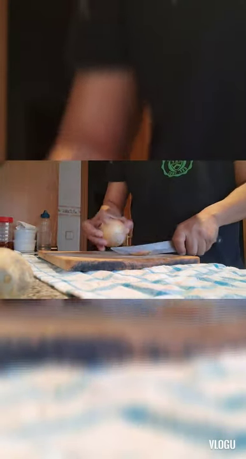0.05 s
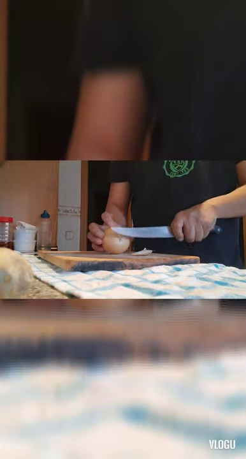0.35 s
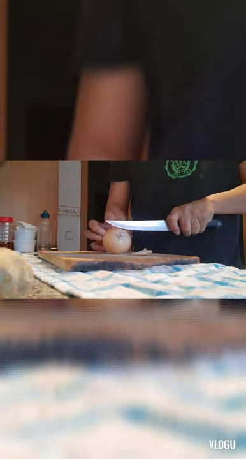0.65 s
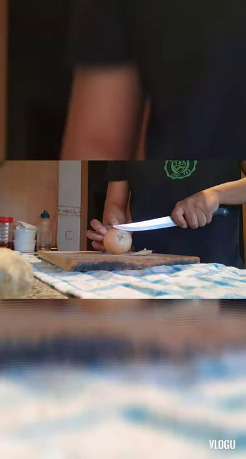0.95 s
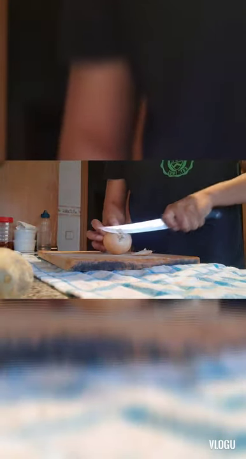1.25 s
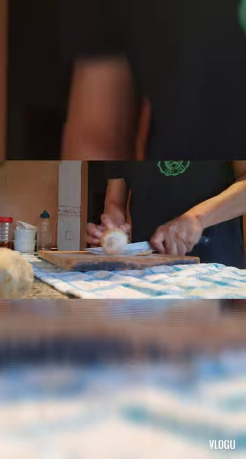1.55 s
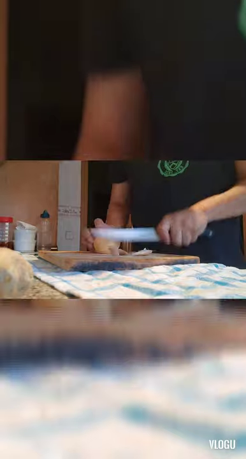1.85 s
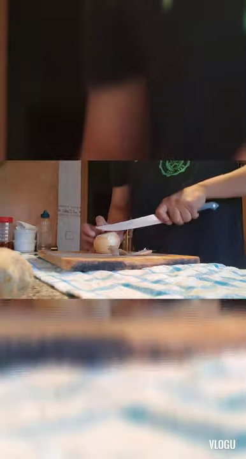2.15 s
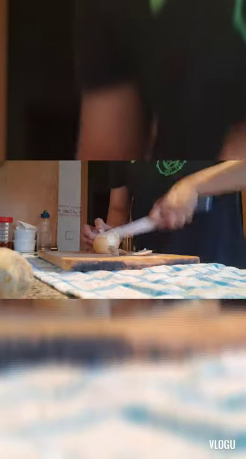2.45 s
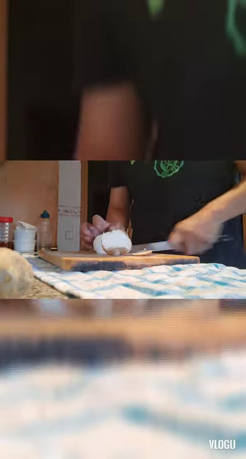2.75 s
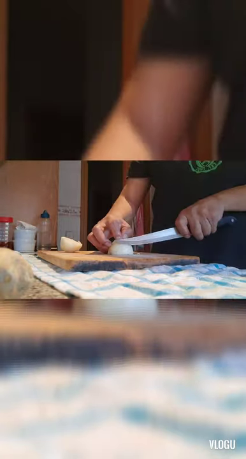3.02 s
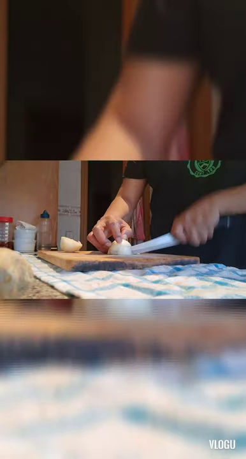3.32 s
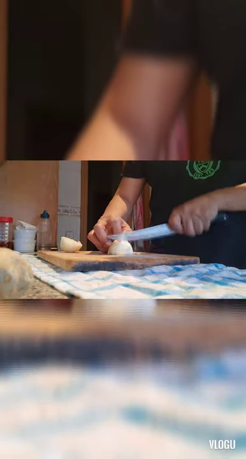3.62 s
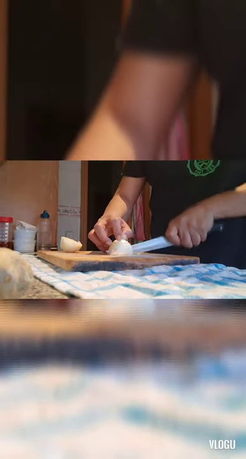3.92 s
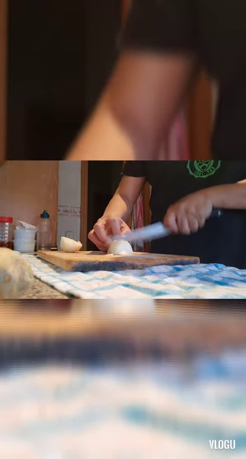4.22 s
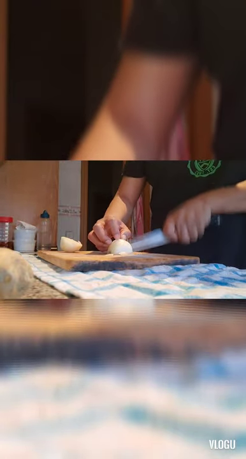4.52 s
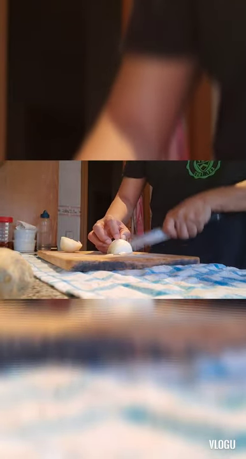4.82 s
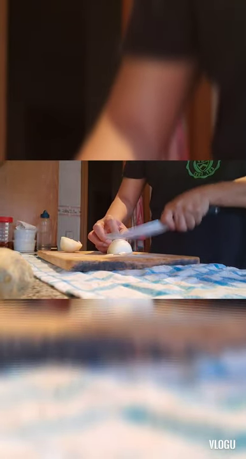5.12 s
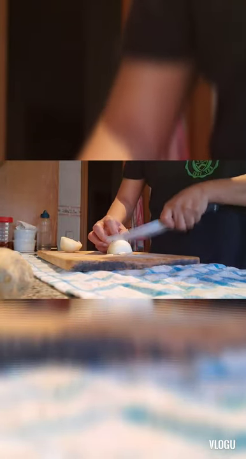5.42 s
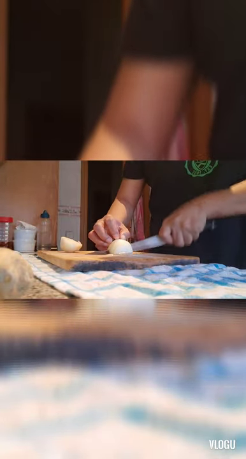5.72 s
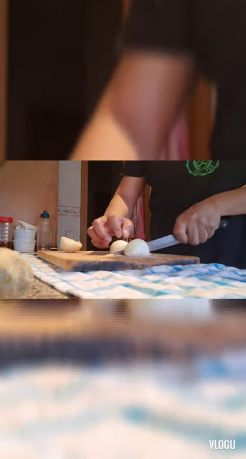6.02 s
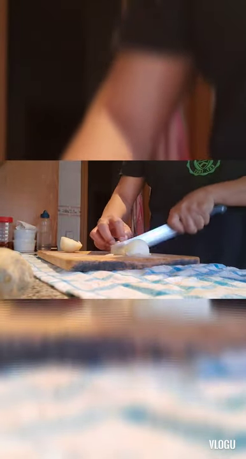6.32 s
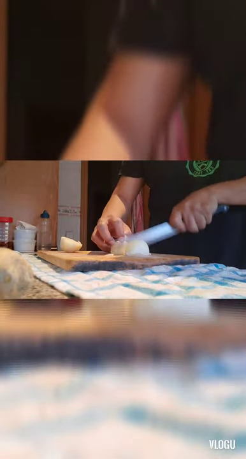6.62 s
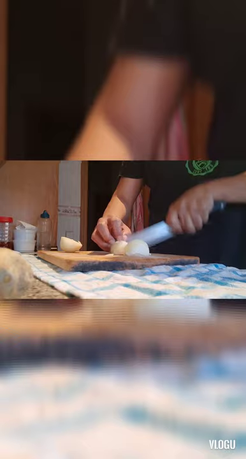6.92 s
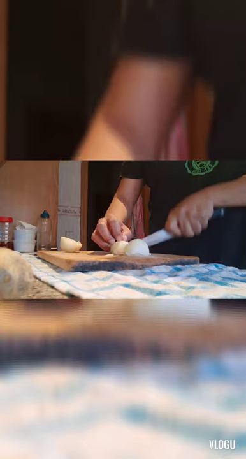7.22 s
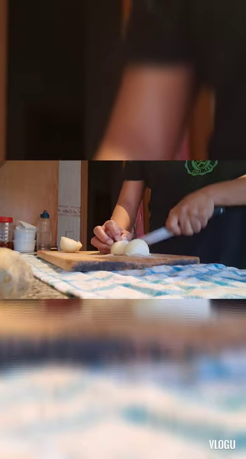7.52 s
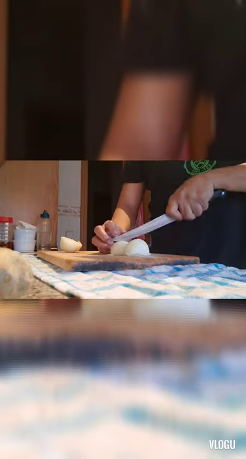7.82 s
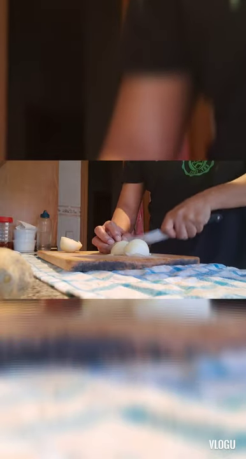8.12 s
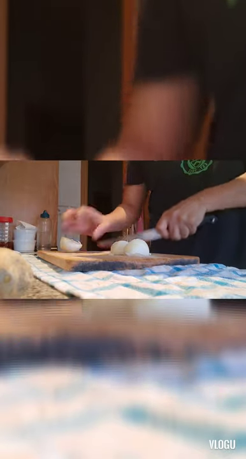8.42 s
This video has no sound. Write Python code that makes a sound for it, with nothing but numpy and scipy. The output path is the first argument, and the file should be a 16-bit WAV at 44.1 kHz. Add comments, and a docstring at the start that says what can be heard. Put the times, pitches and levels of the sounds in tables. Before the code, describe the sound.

A knife cuts an onion on a wooden board, heard from the counter in a small, slightly echoing kitchen. It opens with a faint scrape, a slight ring of the blade and soft bumps. Papery skin rustles from about 1.1 seconds, and at 1.5 a firm, crunching cut lands with a knock and a thud. A second cut tears through dry skin at 2.6, followed by small ticks and a soft slide. From 3.4 to 5.8 seconds come twelve even slices, between four and five a second, each a short, moist crunch ending in a wooden clack. A brief scrape and bump fall near 6 seconds. Six more strokes run from 6.4 to 7.5, and a last single chop lands at 8. A faint low rumble and dull hiss lie underneath throughout.

```python
"""Slicing an onion

A kitchen knife halves and slices an onion on a wooden board in a small, live kitchen. Each stroke
fractures the layers with a crunch; the blade's impact then excites the modes of the board, and the
counter thuds. Between strokes dry skin rustles and ticks, and hands and onion bump and slide on the
wood. A low rumble and a soft, dull background hiss lie underneath."""
import sys
import numpy as np
from scipy import signal
from scipy.fft import rfft, irfft
from scipy.io import wavfile

SR = 44100
rng = np.random.default_rng(int(sys.argv[2]) if len(sys.argv) > 2 else 0)


def transcribe(u):
    """Save the signal u as a 16-bit wav file named by the first command-line argument.

    u: samples, shape (n,) or (channels, n), limited to [-1, 1]; the rate is SR.
    q: integer samples, one column per channel.
    """
    v = np.clip(np.atleast_2d(u).T, -1, 1)
    q = np.round(v * 32767).astype(np.int16)
    wavfile.write(sys.argv[1], SR, q)


N = 377055
AGE = np.arange(SR // 2) / SR  # time since the onset of one event [s]

# knife strokes: (landing time [s], force [dB], bass weight [dB], treble hardness [dB],
# time in the onion [s], crunch level [dB], note of the spot struck [Hz])
STROKES = [(1.547, 4.5, -3, 2, 0.055, 0.5, 480), (2.643, 3, -9.5, 6, .11, -12, 675),
           (3.401, 4, 0, -4, .032, -1.5, 675), (3.573, 4.5, -2, -1.5, 0.061, -16, 665),
           (3.788, 3.5, -0.5, -2, .039, 4.5, 595), (3.991, 2, 1.5, 4, .033, -1, 605),
           (4.207, .5, 2.5, -2.5, 0.039, 3.5, 590), (4.418, 1.5, 1.5, -8, .04, 4, 590),
           (4.626, -1, 3, 7, 0.044, 0.5, 605), (4.82, -3.5, 7.5, 11.5, 0.026, -13, 590),
           (5.086, -2, 5, -18, 0.066, 0.5, 595), (5.329, -.5, 4.5, 3, 0.053, 1, 610),
           (5.548, -0.5, 6.5, 10, 0.035, -5.5, 585), (5.808, 1, 1, 5.5, .043, 4, 605),
           (6.441, -3, 1.5, -21, .05, -11.5, 665), (6.604, 2, -4.5, -20, .019, -24, 590),
           (6.818, -2.5, 5, 6, 0.034, -2, 660), (7.034, 2, 4, -3.5, 0.039, 1.5, 670),
           (7.253, 1, 4, -11.5, 0.044, 3, 595), (7.468, -.5, 5.5, 4, 0.044, 5.5, 595),
           (8.008, 1, 3.5, 5, 0.065, 2.5, 595)]
# spectrum of dry onion skin: (frequency [Hz], relative level [dB])
SKIN_SPECTRUM = [(150, 0.5), (700, 5.5), (2100, -0.5), (3000, 8.5), (4200, 5), (5500, -3), (8000, 1.5),
                 (10500, -6), (15500, -2)]


def knocks(ring_db=-29, ring_t60=0.12, damping=0.23, build_cycles=2, early_db=3, early_s=0.0056,
           clack_db=4.5, clack_s=0.0044, rise_s=0.0016, bend_db=-24, bend_s=0.01,
           spot_db=3.5, spot_width_hz=53, wander_db=3, detune=0.0036, fresh=0.49,
           wall_s=0.0105, wall_db=-11, tail_db=-3, echo_db=-8):
    """Impact excitation: the blade lands with a broadband clack and sets the board's modes ringing."""
    # modes of the board with the blade on it: (frequency [Hz])
    board_hz = [107, 274, 441, 473, 565, 597, 667, 737, 769, 839, 970, 1076, 1469, 1577, 1674, 1730, 1841,
                1916, 2110, 2228, 2320, 2352, 2492, 2594, 2686, 3224, 3320, 3545, 3859, 4080]
    # strength of each of those modes: (relative level [dB])
    board_db = [-14, -5, -8.5, -7, -10.5, -2, -1.5, -13.5, -14, -9, -10, -11, -3.5, -13, -1.5, -4.5, -9.5,
                -15, -5.5, -9, -2, -6.5, -4.5, -11.5, -15, -8, -9.5, -12.5, -5.5, -10]
    # clack of steel on wood: (frequency [Hz], relative level [dB])
    clack_spectrum = [(200, -15.5), (400, -20), (620, 0), (900, -9.5), (1130, -2), (1300, -16.5),
                      (1550, -0.5), (2300, 4.5), (2660, -4.5), (2860, -20.5), (3300, -2), (4100, -10.5),
                      (5000, -22), (11000, -53)]
    # the knock as the walls return it: (frequency [Hz], relative level [dB])
    wall_spectrum = [(200, -12.5), (400, -1.5), (650, 2.5), (1130, -1.5), (1300, -17.5), (1600, -3.5),
                     (2400, -9), (2700, -2.5), (2830, -15.5), (3300, -5.5), (4120, -6), (4350, -12),
                     (5100, -16), (11000, -41.5)]
    hz, mode_db = np.array(board_hz)[:, None], np.array(board_db)[:, None]
    t60 = ring_t60 * (hz / np.median(hz)) ** -damping  # higher modes die sooner
    phase = rng.uniform(0, 2 * np.pi, hz.shape)
    contact = 1 - np.exp(-(AGE / rise_s) ** 2)
    clack_envelope = contact * np.exp(-AGE / clack_s)
    # a mode needs a few cycles to build, drops fast while the blade presses, then rings on
    build = contact * (1 - np.exp(-AGE * hz / build_cycles))
    early = 1 + amp(early_db) * np.exp(-AGE / early_s)
    ringing = build * early * amp(ring_db + mode_db - 60 * AGE / t60)
    bend_envelope = (AGE / bend_s) ** 2 * np.exp(-(AGE / bend_s) ** 2)
    same = np.sqrt(1 - fresh ** 2)  # every blow blends common noise with fresh noise
    common_clack, common_tail = same * smooth_burst(clack_envelope), same * kitchen_tail()
    out = np.zeros(N)
    for s, force_db, weight_db, hard_db, _, _, note_hz in STROKES:
        # each blow strikes a different spot; modes near its note ring harder
        spot, load, turn = rng.standard_normal((3, len(hz), 1))
        favoured_db = spot_db * np.exp(-((hz - note_hz) / spot_width_hz) ** 2)
        waves = np.sin(2 * np.pi * hz * (1 + detune * load) * AGE + phase + turn)
        modes = (ringing * amp(wander_db * spot + favoured_db) * waves).sum(0)
        clack = amp(clack_db) * (common_clack + fresh * smooth_burst(clack_envelope))
        add(clack, wall_s, amp(wall_db) * clack)  # reflection from the tiled wall
        echo = amp(echo_db) * signal.oaconvolve(modes, common_tail + fresh * kitchen_tail())[:len(AGE)]
        tail = amp(tail_db) * (common_tail + fresh * kitchen_tail())
        # the board flexes under the blade: one short, round wooden note
        bend = amp(bend_db + 1.3 * weight_db) * bend_envelope * np.sin(2 * np.pi * note_hz * AGE)
        blow = modes + echo + bend + colour(clack, clack_spectrum) + colour(tail, wall_spectrum)
        # a heavy hand brings out the low modes, a square hard landing the high ones
        low = signal.sosfilt(signal.butter(1, 900, fs=SR, output="sos"), blow)
        high = signal.sosfilt(signal.butter(1, 3200, "high", fs=SR, output="sos"), blow)
        add(out, s, amp(force_db) * (blow + (amp(weight_db) - 1) * low + (amp(hard_db) - 1) * high))
    return out


def crunches(level_db=-36.5, rise_db=11, bite_s=0.0026, stop_s=0.0022, snap_s=0.0037,
             juice_db=-23, juice_s=0.09, peel_db=-37):
    """Fracture noise: cells burst ever harder as the edge sinks, and each layer parts with a snap."""
    # bursting onion cells: (frequency [Hz], relative level [dB])
    cell_spectrum = [(100, 2.5), (400, -1), (640, 7.5), (950, -3), (2000, -3), (2700, 2.5), (4000, -0.5),
                     (5200, -8.5), (7800, -8.5), (10500, -21.5), (13000, -20.5), (15400, -14)]
    # the outer layer and the firm heart: (depth [share of the cut], level against the crunch [dB])
    layers = [(0, 12), (.53, 20)]
    flesh, peel = np.zeros((2, N))
    for k, (s, _, _, _, length, db, _) in enumerate(STROKES):
        since_landing = AGE - length
        cells = crackle(per_s=1500, spread_db=4, clump_db=4, clump_s=0.0023)
        cells *= amp(db + rise_db * np.minimum(since_landing, 0) / length)
        cells *= np.exp(-np.maximum(since_landing, 0) / stop_s)
        cells *= 1 - np.exp(-AGE / bite_s)
        add(flesh, s - length, cells)
        for depth, layer_db in layers:
            add(flesh, s - length * (1 - depth), amp(db + layer_db) * snap(snap_s))
        juice = crackle(per_s=240, spread_db=0.5, clump_db=6, clump_s=0.012)  # the wet slice comes away
        add(flesh, s, juice * amp(juice_db + db / 4) * np.exp(-AGE / juice_s))
        if k < 2:  # the first two cuts also tear through the dry skin
            add(peel, s - length, cells)
    cuts = amp(level_db) * colour(flesh, cell_spectrum) + amp(peel_db) * colour(peel, SKIN_SPECTRUM)
    return in_kitchen(cuts, wet_db=-3)


def thuds(push_db=-45, thud_db=-43, thud_t60=0.34, bump_db=-42, bump_t60=0.23):
    """Structure-borne sound: the push of each cut, the blows and the bumps shake the counter."""
    # hands and onion bumping on the board: (time [s], level [dB])
    bumps = [(0.305, -1.5), (.333, -7), (.378, -12), (1.546, 12), (3.048, -4.5), (3.936, -0.5), (4.998, -1),
             (6.054, -7.5)]
    # the counter's response to pushing and to impact: (frequency [Hz], relative level [dB])
    push_spectrum = [(40, -26), (110, -0.5), (170, -1), (230, -16), (330, -8.5), (700, -38.5)]
    thud_spectrum = [(25, -19.5), (63, 1.5), (82, 0.5), (105, 6), (135, -10), (280, -10), (700, -54.5)]
    push, impacts = np.zeros((2, N))
    for s, force_db, weight_db, _, length, db, _ in STROKES:
        press = signal.windows.tukey(round(length * SR) + 400, 0.5)
        add(push, s - length, amp(push_db + db / 2 + weight_db / 2) * press)
        add(impacts, s, amp(thud_db + force_db - 60 * AGE / thud_t60))
    for s, db in bumps:
        add(impacts, s, amp(bump_db + db - 60 * AGE / bump_t60))
    pressed = colour(push * rng.standard_normal(N), push_spectrum)
    return pressed + colour(impacts * rng.standard_normal(N), thud_spectrum)


def dry_skin(rustle_db=-2, tick_db=-10, tick_s=0.0033, flakes_per_s=35, flake_db=29, settle_s=0.14):
    """Random impulses: dense ones merge into a papery rustle, sparse ones tick as flakes settle."""
    # skin brushed by blade and fingers: (time [s], duration [s], level [dB])
    brushes = [(.01, .11, -64), (1.121, 0.21, -56), (1.332, .13, -57.5), (1.721, 0.13, -62.5),
               (2, 0.072, -70), (2.548, 0.12, -44), (2.749, 0.215, -59.5)]
    # the loudest ticks of the skin: (time [s], level [dB])
    loud_ticks = [(1.196, -8), (1.2303, -11.5), (1.617, 2), (2.1538, -24), (2.767, -13), (2.79, -12.5),
                  (2.912, -18.5), (5.9244, -19)]
    # a bright tick: (frequency [Hz], relative level [dB])
    tick_spectrum = [(200, -4), (1800, -5), (3000, 6), (5500, 3.5), (8000, 5.5), (10500, -1.5),
                     (15500, 8)]
    rustle, ticks = np.zeros((2, N))
    for s, length, db in brushes:
        touch = signal.windows.tukey(round(length * SR), 0.6)
        flakes = crackle(per_s=3200, spread_db=1, clump_db=-0.5, clump_s=0.0093)
        add(rustle, s, amp(rustle_db + db) * touch * flakes[:len(touch)])
        loose = (rng.random(len(AGE)) < flakes_per_s / SR) * rng.standard_normal(len(AGE))
        add(ticks, s, amp(tick_db + flake_db + db) * loose * np.exp(-AGE / settle_s))
    for s, db in loud_ticks:
        add(ticks, s, amp(tick_db + db) * snap(tick_s))
    return in_kitchen(colour(rustle, SKIN_SPECTRUM) + colour(ticks, tick_spectrum), wet_db=-4)


def slides(level_db=-2, blade_hz=1480, blade_db=-47, blade_t60=0.28):
    """Sliding friction rubs noise from the board; the blade vibrates freely as it is first lifted."""
    # onion and blade dragged over the wood: (time [s], duration [s], level [dB])
    drags = [(.01, 0.088, -50.5), (2.819, 0.11, -53), (5.932, 0.0263, -42), (6.043, 0.02, -52)]
    # rubbed wood: (frequency [Hz], relative level [dB])
    wood_spectrum = [(80, -5.5), (240, 8.5), (450, 8), (900, 4), (1700, -2.5), (2900, -11.5),
                     (5000, -22.5), (12000, -30.5)]
    friction = np.zeros(N)
    for s, length, db in drags:
        touch = signal.windows.tukey(round(length * SR), 0.4)
        add(friction, s, amp(level_db + db) * touch * rng.standard_normal(len(AGE))[:len(touch)])
    out = in_kitchen(colour(friction, wood_spectrum), wet_db=-2)
    blade = amp(blade_db - 60 * AGE / blade_t60) * np.sin(2 * np.pi * blade_hz * AGE)
    add(out, drags[0][0], blade)
    return out


def rumble(rest_db=-68.5, shake_db=-57.5, build_s=0.2, fade_s=0.31):
    """Incoherent sources add in power: the room at rest, and the arm shaking the counter as it cuts."""
    # low rumble of the room: (frequency [Hz], relative level [dB])
    rumble_spectrum = [(25, -24.5), (55, -5.5), (100, -2), (150, -9), (220, -17), (400, -34.5), (1000, -50)]
    t = np.arange(N) / SR
    coarse_t = t[::256]
    since_landing = coarse_t - np.array(STROKES)[:, :1]
    shakes = np.exp(np.minimum(since_landing / build_s, -since_landing / fade_s))
    level = np.hypot(amp(rest_db), amp(shake_db) * np.linalg.norm(shakes, axis=0))
    return np.interp(t, coarse_t, level) * colour(rng.standard_normal(N), rumble_spectrum)


def background_hiss():
    """Amplitude-modulated noise: a soft, dull background hiss slowly rises and falls."""
    # the dull hiss: (frequency [Hz], relative level [dB])
    hiss_spectrum = [(100, -2.5), (300, 1), (950, -3.5), (1400, -9.5), (2500, -22), (6000, -28.5),
                     (15000, -40)]
    # its rise and fall: (time [s], level [dB])
    hiss_levels = [(0, -73.5), (.65, -83.5), (1.35, -67.5), (2.25, -85.5), (3.2, -65), (6.25, -73),
                   (8.55, -67)]
    level_db = np.interp(np.arange(N) / SR, *np.transpose(hiss_levels))
    return amp(level_db) * colour(rng.standard_normal(N), hiss_spectrum)


def kitchen_tail(build_s=0.0056):
    """Diffuse reverberation: wall reflections build up quickly and decay band by band."""
    # the kitchen's decay: (frequency [Hz], reverberation time [s])
    decay_times = [(100, 0.59), (300, 0.2), (700, .25), (2000, 0.25), (4500, 0.24), (13000, 0.13)]
    hz, t, bands = signal.stft(rng.standard_normal(len(AGE)), SR, nperseg=256)
    decay = amp(-60 * t / at_frequency(decay_times, hz)[:, None])
    tail = signal.istft(bands * decay, SR, nperseg=256)[1][:len(AGE)]
    tail *= 1 - np.exp(-(AGE / build_s) ** 2)
    return tail / np.linalg.norm(tail)


def in_kitchen(x, wet_db):
    """Convolution with the room's response adds reflections to the direct sound."""
    return x + amp(wet_db) * signal.oaconvolve(x, kitchen_tail())[:N]


def crackle(per_s, spread_db, clump_db, clump_s):
    """Shot noise of rms 1: random impulses whose level fluctuates in clumps."""
    count = len(AGE)
    sizes = amp(spread_db * np.minimum(rng.exponential(1, count), 4)) * rng.choice([-1, 1], count)
    clumps = amp(clump_db * np.interp(AGE / clump_s, np.arange(count), rng.standard_normal(count)))
    return unit_rms(sizes * clumps * (rng.random(count) < per_s / SR))


def snap(decay_s):
    """One crack: exponentially decaying noise of unit energy."""
    x = rng.standard_normal(len(AGE)) * np.exp(-AGE / decay_s)
    return x / np.linalg.norm(x)


def smooth_burst(envelope, passes=6):
    """Repeated whitening gives a noise burst of unit energy without deep spectral holes."""
    x = rng.standard_normal(len(envelope))
    for _ in range(passes):
        spectrum = rfft(x * envelope)
        white = unit_rms(irfft(spectrum / (abs(spectrum) + 1e-12), len(x)))
        x = np.tanh(white / (envelope + 1e-6) * np.std(envelope) / 2)
    return x * envelope / np.linalg.norm(x * envelope)


def colour(x, points, size=4096):
    """Applies a minimum-phase filter of unit energy with the given spectral shape."""
    log_gain = np.log(amp(at_frequency(points, abs(np.fft.fftfreq(size, 1 / SR)))))
    response = np.exp(np.conj(signal.hilbert(log_gain)))
    taps = np.fft.ifft(response).real[:size // 2]
    return signal.oaconvolve(x, taps / np.linalg.norm(taps))[:len(x)]


def at_frequency(points, hz):
    """Interpolates a table on a log-frequency axis."""
    f, value = np.transpose(points)
    return np.interp(np.log(hz + 1), np.log(f + 1), value)


def amp(db):
    """Decibels to amplitude ratio."""
    return 10 ** (np.asarray(db) / 20)


def unit_rms(x):
    """Scales to rms 1."""
    return x / np.sqrt(np.mean(x ** 2) + 1e-20)


def add(mix, s, sound):
    """Superposes a sound on the mix at time s."""
    part = mix[max(round(s * SR), 0):][:len(sound)]
    part += sound[:len(part)]


def scene():
    """Superposition: all sources sum at one microphone on the counter."""
    return (knocks() + crunches() + thuds() + dry_skin() + slides() + rumble() + background_hiss())[None]


def record(dry, ceiling=0.52, low_cut_hz=38, high_cut_hz=16100):
    """Band limiting and saturation: the microphone loses deep bass and top treble, and rounds peaks."""
    lean = signal.sosfilt(signal.butter(2, low_cut_hz, "high", fs=SR, output="sos"), dry)
    rounded = ceiling * np.tanh(lean / ceiling)
    low_pass = signal.firwin(511, high_cut_hz, window=("kaiser", 9), fs=SR)
    return signal.oaconvolve(rounded, low_pass[None], "same")


dry = scene()
out = record(dry)
transcribe(out)
```